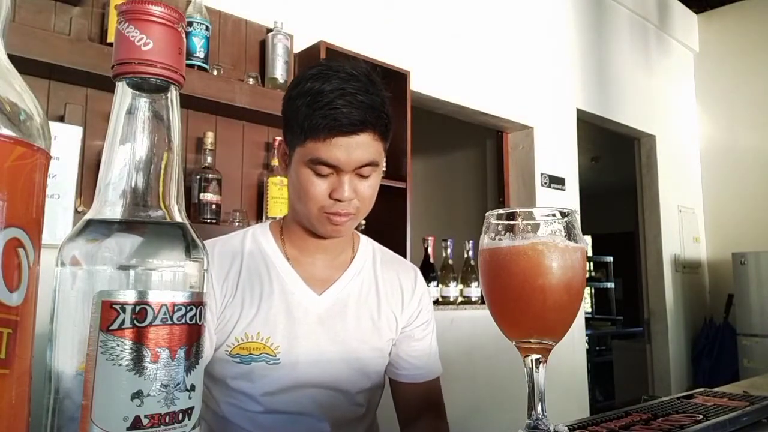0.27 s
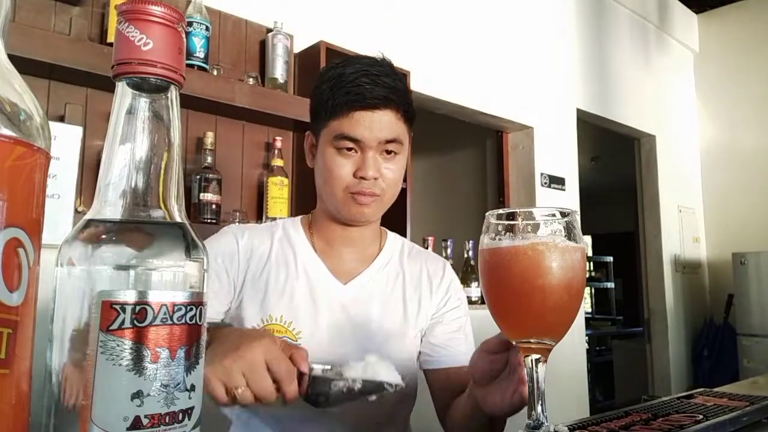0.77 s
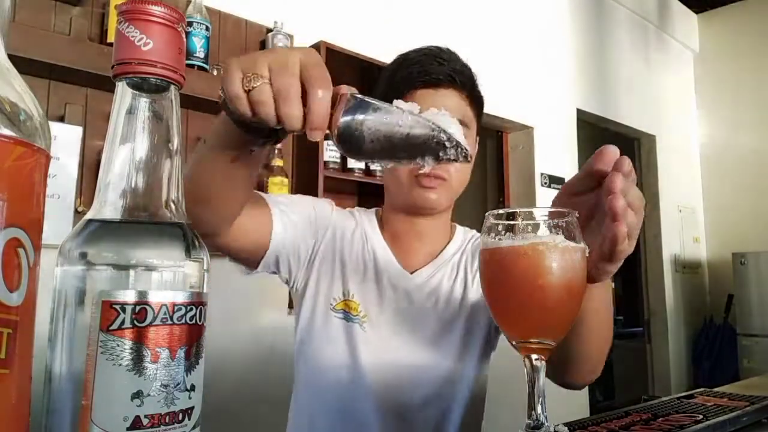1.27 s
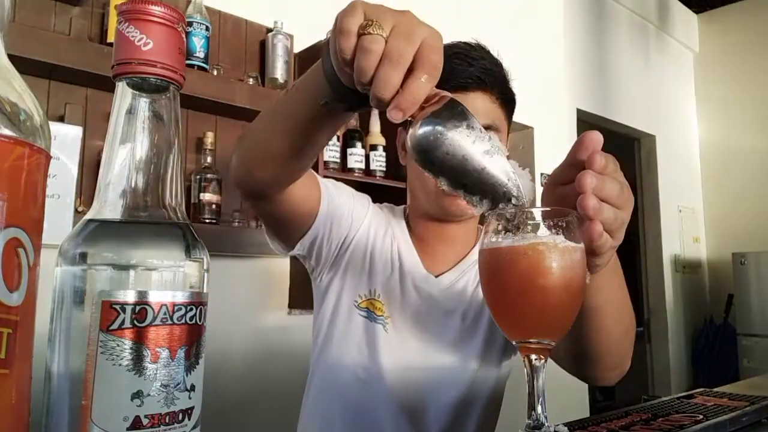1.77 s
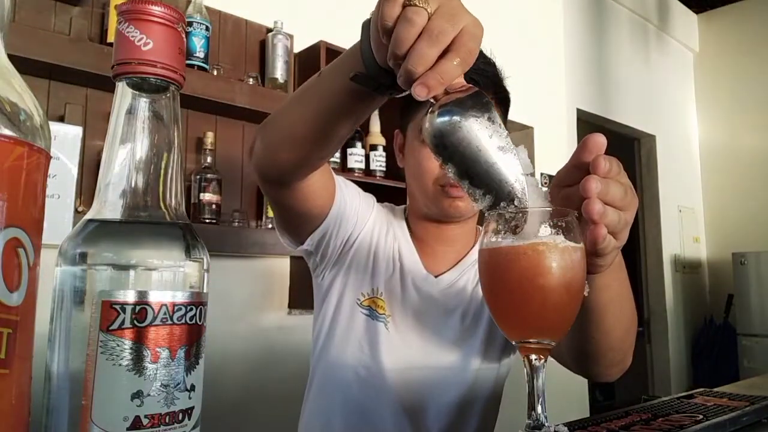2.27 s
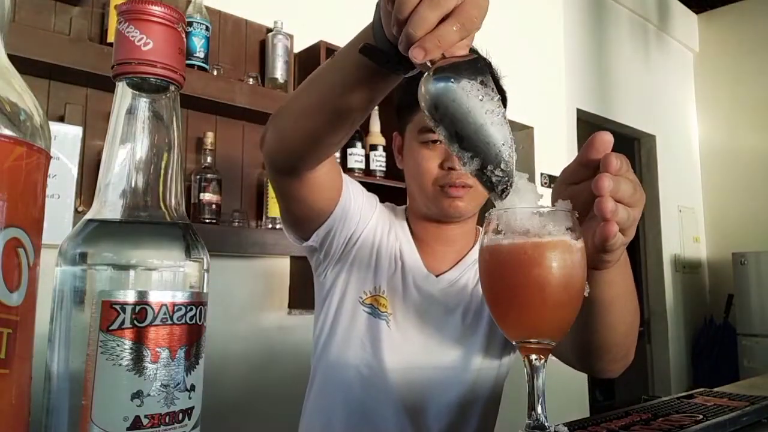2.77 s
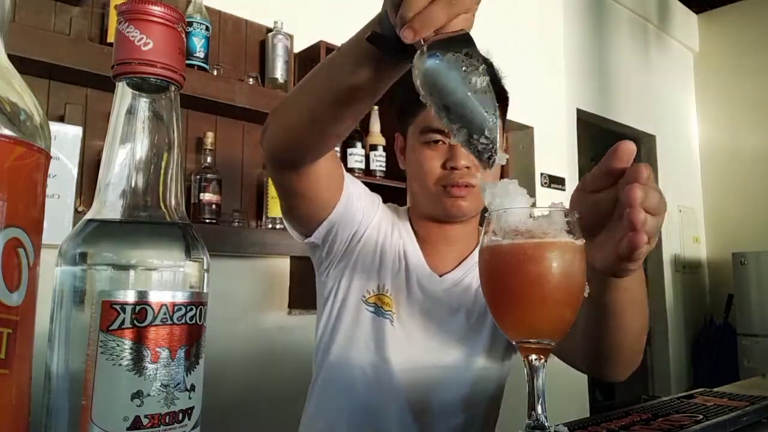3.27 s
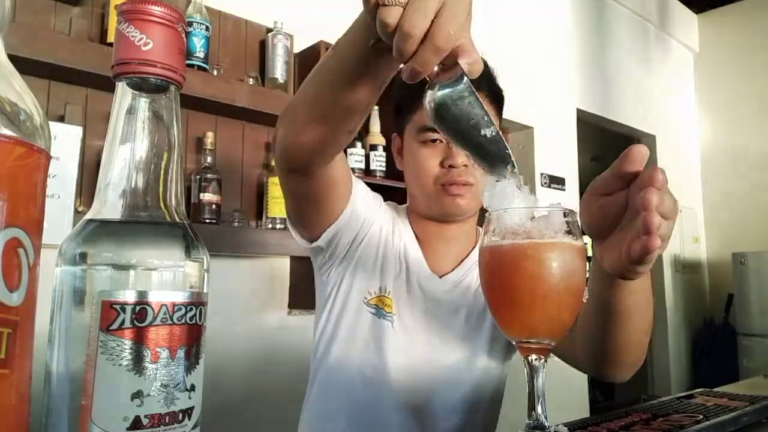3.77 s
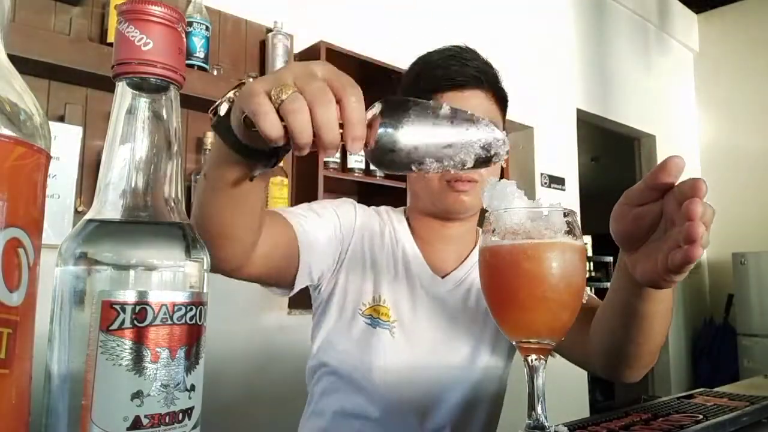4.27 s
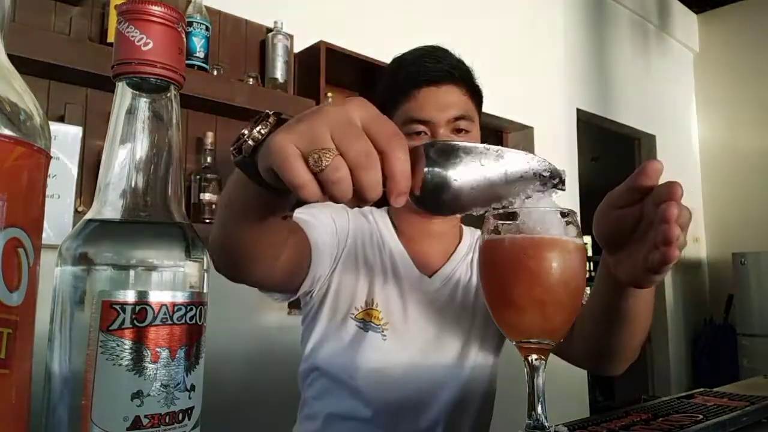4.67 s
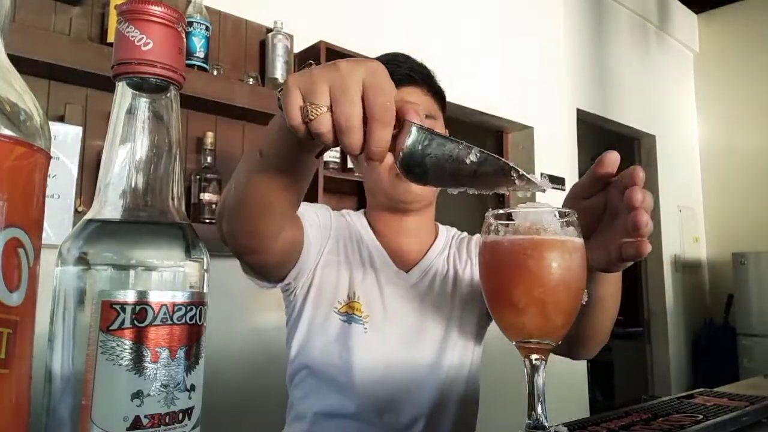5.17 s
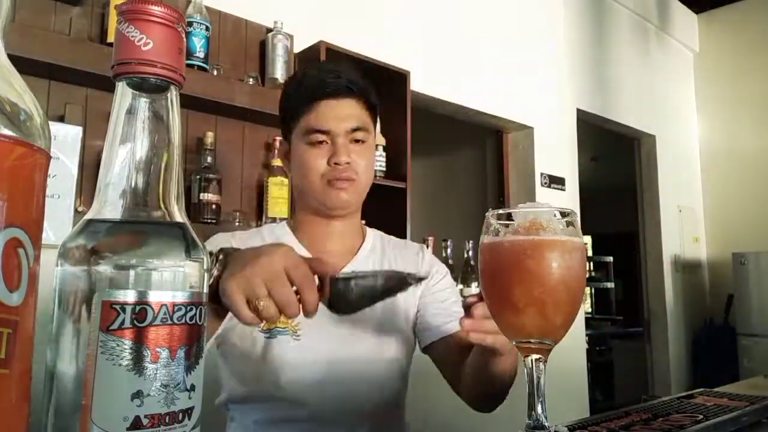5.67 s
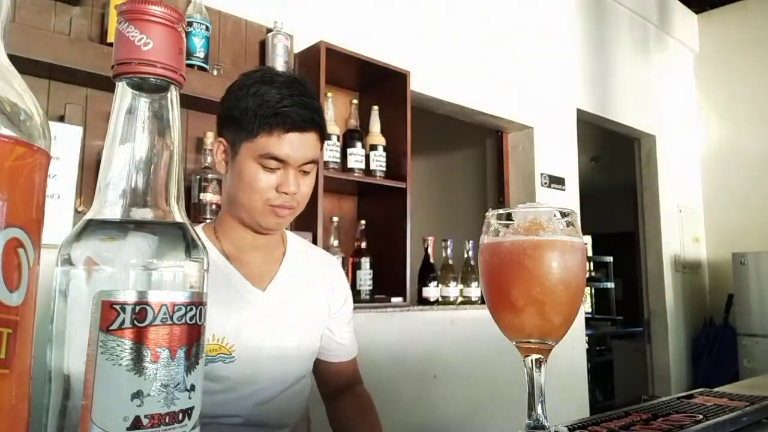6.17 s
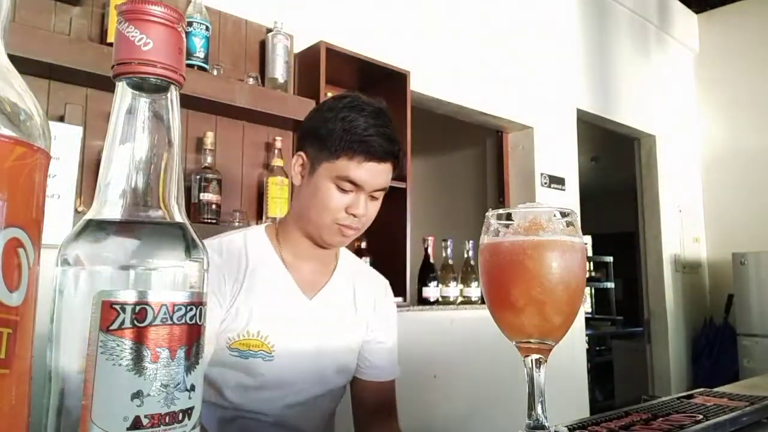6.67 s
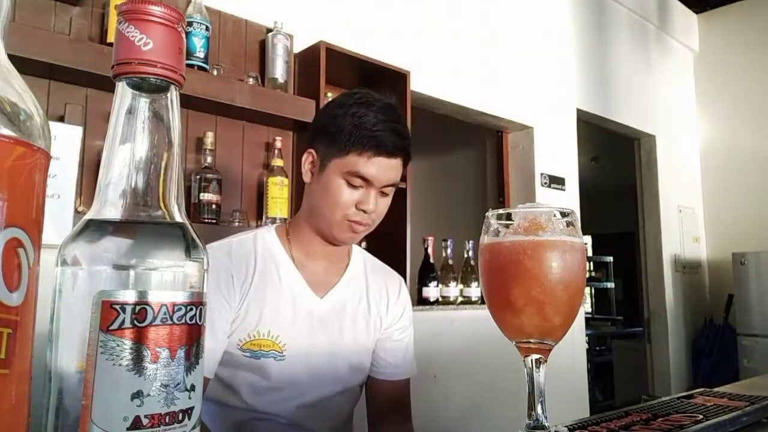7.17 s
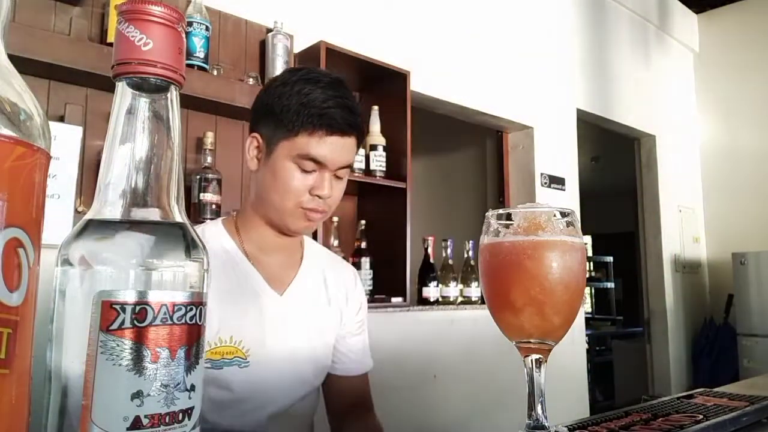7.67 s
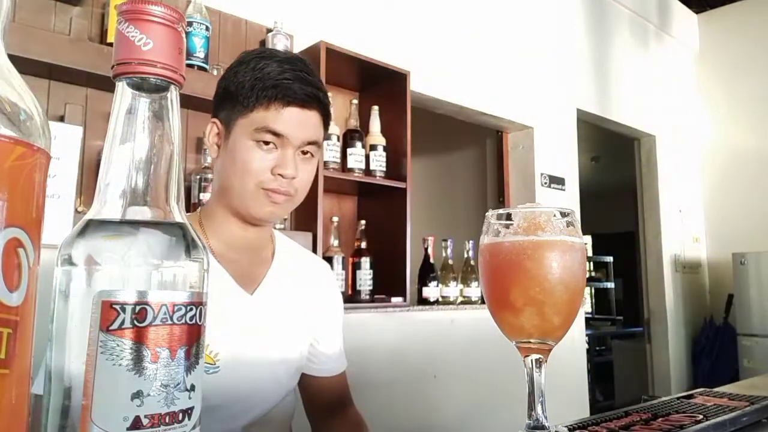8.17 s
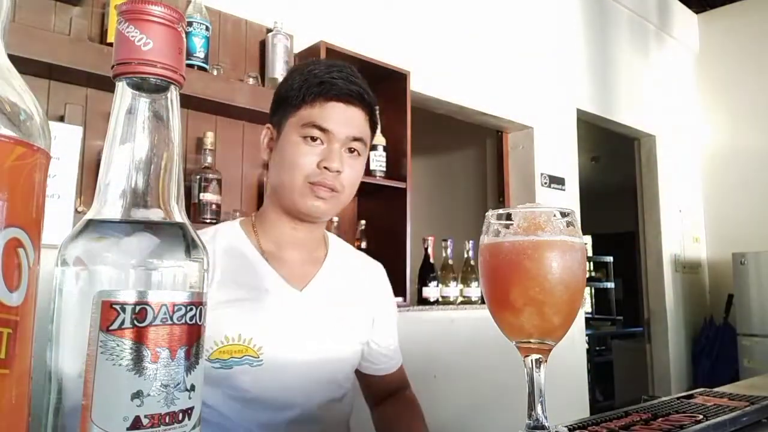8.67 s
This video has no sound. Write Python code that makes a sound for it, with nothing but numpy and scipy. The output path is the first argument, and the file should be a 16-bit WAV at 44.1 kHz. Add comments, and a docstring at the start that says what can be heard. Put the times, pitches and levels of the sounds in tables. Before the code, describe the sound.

A metal scoop chops seven times into crushed ice, then digs through loose wet lumps and clinks in a quiet bar.

```python
"""A hard-walled bar, one microphone a few metres from a metal scoop chopping seven times into crushed ice.
Each blow arrives first as a thud through the counter, then as a crunch through the air, and the steel
rings briefly. Then the scoop digs through loose, wet ice, lumps knock about and metal clinks and settles.
Faint ticks and thin tones come and go over the room's noise and a low hum."""
import sys
import numpy as np
from scipy import signal
from scipy.fft import rfft
from scipy.io import wavfile
from scipy.ndimage import uniform_filter1d

SR = 44100
rng = np.random.default_rng(int(sys.argv[2]) if len(sys.argv) > 2 else 0)


def dump_mix(stems):
    """Bounce the given channels to the path in sys.argv[1] as a 16-bit WAV at rate SR."""
    frames = np.atleast_2d(stems).T  # one column per channel
    limited = np.clip(frames, -1, 1)  # hard clip at full scale
    pcm = np.round(limited * 32767).astype(np.int16)
    wavfile.write(sys.argv[1], SR, pcm)


N = 392490
TIME = np.arange(20480) / SR  # seconds within one short sound
HZ = np.fft.rfftfreq(4096, 1 / SR)  # frequencies of every filter curve

# The bar's reverberation. Each row: frequency in Hz, seconds to fall 60 dB.
ROOM_DECAY = [(100, 0.22), (400, 0.59), (1000, 0.34), (2700, 0.42), (6000, .36), (15000, 0.29)]
# Scattered returns from the walls. Each row: delay in seconds, spread in seconds, dB over the tail.
WALL_RETURNS = [(0.0246, 0.0049, 5.5), (0.04, 0.0011, 3)]
# Colour of the room tone. Each row: frequency in Hz, gain in dB.
ROOM_TONE_COLOUR = [(20, -8), (36, -11), (56, -3), (110, -1.5), (145, -10), (185, -8), (260, -17),
                    (700, -22), (950, -19), (2400, -25.5), (5200, -38), (7100, -39.5), (8400, -34.5),
                    (11500, -43.5), (15500, -38)]
# Level of the room's noise, which swells as the chops' reverberation lingers.
# Each row: time in seconds, level in dB.
ROOM_TONE_LEVELS = [(0, -57), (2.2, -54.5), (2.6, -53.5), (3.4, -56), (4.9, -52), (5.3, -56), (8.9, -56)]
# The low hum. Each row: pitch in Hz, level in dB, width in Hz.
HUM_TONES = [(55.9, -58.5, 26), (107.8, -62, 19)]
# Blows of the scoop. Each row: start in seconds, level in dB, contact from 0 (edge) to 1 (tip),
# extra body in dB, extra sizzle in dB, centre of the sizzle in Hz.
BLOWS = [(0.1802, -29, 0.31, -1.5, -7, 10200), (0.8134, -24.5, 0, 2, -3, 11600),
         (1.612, -25, 0.17, 6, 4, 5400), (2.254, -27, 0, 11.5, 1, 9000), (3.8366, -26, 0.67, 4, 6, 10000),
         (4.2997, -24.5, 0.88, 2, 10.5, 11300), (4.7099, -22.5, 0.75, 1.5, 6.5, 8950)]
# The counter's thud. Each row: frequency in Hz, gain in dB.
COUNTER_COLOUR = [(40, -6), (90, 0), (200, 0), (500, 3), (1200, -4), (2200, -8.5), (5000, -27),
                  (15000, -31)]
# How the thud dies. Each row: frequency in Hz, seconds to fall 60 dB.
COUNTER_DECAY = [(80, 0.98), (200, 0.78), (500, 0.27), (1500, 0.36), (10000, 0.37)]
# Ice giving way. Each row: frequency in Hz, gain in dB under the edge, gain in dB under the tip.
CRUNCH_COLOUR = [(60.4, -35, -18), (170, -3.5, -13), (374, -14, -15.5), (773, -12, -5), (1070, -8, -0.5),
                 (1470, -0.5, -1), (1910, -9, -4.5), (2760, -7, -3), (3430, -13, -6.5), (6180, -24, -26.5),
                 (8360, -13.5, -20), (10000, -21.5, -22), (13000, -20.5, -30), (15500, -19, -21)]
# The scoop's steel. Each row: pitch in Hz, dB struck on the edge, dB on the tip, seconds to fall 60 dB.
SCOOP_MODES = [(980, -15, 17, 0.037), (1142, 2, 9, 0.053), (1442, -5.5, -4, 0.29), (1580, -10, -14, 0.19),
               (1780, -18, 11, 0.28), (1960, -13, 5, 0.17), (2400, -10, -37, 0.55), (2513, -6, 1, 0.5),
               (2593, -4.5, 7.5, 0.18), (2810, -18, 4, 0.42), (2900, -23, -6, 0.48), (2950, -8, -2, 0.35),
               (3105, -12.5, -11, 0.33), (3520, -18, -28, 0.14), (4970, -14.5, -12, 0.37),
               (8120, -9, -21, 0.21), (8240, -12, -3, 0.22)]
# Dry ticks close by. Each row: start in seconds, level in dB, half width in octaves, decay in seconds.
DRY_TICKS = [(1.112, -68.5, 0.35, 0.0018), (1.5779, -42, 15, 0.0017), (1.903, -69, 1.2, .02),
             (2.915, -66.5, 2.7, 0.022), (4.99, -70, 1.1, 0.018)]
# Wet lumps. Each row: start in seconds, level in dB, hollow pitch in Hz, hollow ring over crack in dB.
LUMP_KNOCKS = [(1.308, -59.5, 1900, -3), (5.353, -62, 1770, 2), (6.501, -53, 890, -8.5),
               (6.672, -56, 1500, -9), (6.711, -45, 736, -1), (7.0067, -48, 1180, -13),
               (7.035, -40.5, 862, 0), (7.0855, -45.5, 2490, 3), (7.094, -44, 1390, -4.5),
               (7.373, -53, 860, 1), (7.624, -54.5, 1420, 5), (7.649, -48.5, 986, 2),
               (7.6806, -47, 2090, 6), (7.894, -38.5, 777, -2.5), (7.961, -48, 1800, 14)]
# A lump's crack. Each row: frequency in Hz, gain in dB.
LUMP_COLOUR = [(60, 3), (180, 1.5), (400, -2), (900, 1.5), (1600, -2), (2700, 0.5), (3800, -12.5),
               (6000, -19), (8700, -15.5), (12000, -23.5), (15500, -14.5)]
# A glancing touch. Each row: frequency in Hz, gain in dB.
CLACK_COLOUR = [(100, -26), (700, -14), (1050, 1.5), (1600, 4), (2300, -8), (3200, -2.5), (5300, -9.5),
                (6200, -25), (8500, -21), (15000, -35)]
# Far-off tones. Each row: start in seconds, length in seconds, pitch in Hz, level in dB.
DISTANT_TONES = [(5.42, 0.36, 1187, -68), (8.24, 0.2, 3900, -73), (8.3, 0.34, 1146, -71)]
# Strokes through loose ice. Each row: start in seconds, level in dB.
DIG_STROKES = [(6.09, -68), (6.3, -65.5), (6.42, -61.5), (6.68, -50), (6.99, -49), (7.29, -49.5),
               (7.585, -52.5), (7.859, -51)]
# Crumbs on steel. Each row: frequency in Hz, gain in dB.
SCRAPE_COLOUR = [(100, -1), (500, -13), (900, -7), (1500, 4.5), (2300, 4.5), (3600, -7), (5500, -10.5),
                 (8700, -6.5), (12000, -11), (15500, -6)]
# The squeak's partials. Each row: factor on its pitch, dB against its level.
SQUEAK_PARTIALS = [(.81, -13), (.97, 6), (1.03, -5), (1.1, 8)]
# Metal touching metal. Each row: start in seconds, level in dB, decay of the chatter in seconds.
METAL_TOUCHES = [(8.612, -36.5, 0.0053), (8.767, -48.5, 0.0084), (8.816, -47.5, 0.023)]
# The clink's ring. Each row: pitch in Hz, relative level in dB, seconds to fall 60 dB if left free.
CLINK_MODES = [(702, -10, 0.26), (1435, -1.5, 0.41), (1540, -7, 0.24), (2681, -6.5, 0.36),
               (4200, -20, 0.43), (5130, -13.5, 0.26), (6160, -21, 0.27), (7030, -18, 0.25),
               (8570, -10.5, 0.31), (9000, -9, 0.23), (11660, -17, 0.24), (12800, -15, 0.24),
               (14500, -13, 0.26)]

STROKE_S, STROKE_RISE_S = 0.18, 0.08  # the scoop speeds up, then slows to a stop


def amp(db):
    """Decibels to gain."""
    return 10 ** (np.asarray(db) / 20)


def unit(x):
    """Scales to an energy of one."""
    return x / np.sqrt(np.sum(x ** 2) + 1e-20)


def curve(points, hz=HZ):
    """Joins points by straight lines over log frequency."""
    f, value = np.transpose(points)
    return np.interp(np.log(hz + 1), np.log(f + 1), value)


def bump(hz, octaves):
    """A bell of height one over log frequency."""
    return np.exp(-.5 * (np.log2((HZ + 1) / hz) / octaves) ** 2)


def add(mix, start, db, sound):
    """Mixes in a sound whose energy equals a twentieth of a second at db."""
    part = mix[max(round(start * SR), 0):][:len(sound)]
    part += amp(db) * np.sqrt(SR / 20) * unit(sound)[:len(part)]


def colour(x, db):
    """Causal filter with the given gain over HZ."""
    log_gain = np.log(amp(np.r_[db, db[-2:0:-1]]))
    taps = np.fft.ifft(np.exp(np.conj(signal.hilbert(log_gain)))).real
    return signal.oaconvolve(x, taps[:len(HZ)])[:len(x)]


def grains(envelope, per_s, spread_db):
    """Random clicks of uneven size under an envelope."""
    count = len(envelope)
    size = amp(spread_db * np.minimum(rng.exponential(1, count), 3))
    return unit(envelope * size * rng.choice([-1, 1], count) * (rng.random(count) < per_s / SR))


def whiten(x):
    """Evens out the broad colour of a short burst."""
    power = uniform_filter1d(abs(rfft(x[:2 * len(HZ) - 2])) ** 2, size=36)
    return unit(colour(x, -10 * np.log10(abs(power) + 1e-6)))


def dying_noise(t60):
    """Noise in which each band dies at its own speed."""
    hz, t, bands = signal.stft(rng.choice([-1., 1.], len(TIME)), SR, nperseg=256)
    fade = amp(-60 * t / curve(t60, hz)[:, None])
    return unit(signal.istft(bands * fade, SR)[1][:len(TIME)])


def complex_noise(count):
    """Random values that unsettle a tone's level and phase."""
    return rng.standard_normal(count) + 1j * rng.standard_normal(count)


def ring(modes, blur):
    """Decaying modes, each with an energy set by its dB; reflections make them waver."""
    out, moments = 0, np.linspace(0, TIME[-1], 32)
    for hz, db, t60 in modes:
        waver = np.interp(TIME, moments, 1 + blur * complex_noise(len(moments)))
        tone = np.exp((2j * np.pi * hz - np.log(1000) / t60) * TIME + 2j * np.pi * rng.random())
        out = out + amp(db) * unit((waver * tone).real)
    return unit(out)


def fuzzy_tone(hz, width_hz):
    """A wavering tone of rms one that follows a pitch curve."""
    pole = np.exp(-np.pi * width_hz / SR)
    waver = signal.lfilter([1], [1, -2 * pole, pole * pole], complex_noise(len(hz)))
    tone = np.exp(2j * np.pi * np.cumsum(hz) / SR)
    return np.sqrt(len(hz)) * unit((waver * tone).real)


def glide(start, length, hz, db, width_hz, arch=0, rise_hz_per_s=0):
    """A fuzzy tone swells and fades once; its pitch may climb, or arch by a share of itself."""
    swell = np.sin(np.pi * np.minimum(TIME / length, 1))
    pitch = hz * (1 - arch * (1 - swell)) + rise_hz_per_s * (TIME - length / 2)
    out = np.zeros(N)
    out[round(start * SR):][:len(TIME)] = amp(db) * swell * fuzzy_tone(pitch, width_hz)
    return out


def room(x, wet_db):
    """Direct sound at the microphone, then a diffuse tail that swells where the walls answer."""
    swell_db = sum(db * np.exp(-((TIME - delay) / spread) ** 2) for delay, spread, db in WALL_RETURNS)
    onset = np.clip((TIME - .003) / 0.0014, 0, 1)
    response = amp(wet_db) * whiten(dying_noise(ROOM_DECAY) * onset * amp(swell_db))
    response[0] += 1
    return signal.oaconvolve(x, unit(response))[:len(x)]


def room_tone():
    """The bar's noise, which swells as the chops' reverberation lingers, and a wavering low hum."""
    air = np.sqrt(N) * unit(colour(rng.standard_normal(N), curve(ROOM_TONE_COLOUR)))
    level_db = np.interp(np.arange(N) / SR, *np.transpose(ROOM_TONE_LEVELS))
    hum = sum(amp(db) * fuzzy_tone(np.full(N, hz), width) for hz, db, width in HUM_TONES)
    return air * amp(level_db) + hum


def counter_thuds(lead_s=.0092):
    """Each chop runs through the woodwork and reaches the microphone ahead of its airborne sound."""
    out = np.zeros(N)
    for start, db, _, body_db, *_ in BLOWS:
        push = (TIME == 0) * 0.25 + dying_noise(COUNTER_DECAY)
        thud_db = -31.5 + .3 * db + 0.26 * body_db  # harder and deeper chops shake it more
        add(out, start - lead_s, thud_db, colour(push, curve(COUNTER_COLOUR)))
    return out


def chops(body_hz=614, shimmer_hz=2720, shimmer_t60_s=0.51):
    """The steel bites, the ice gives way a few ms later, crumbs scatter and the scoop rings."""
    out = np.zeros(N)
    bite = (TIME < .0105) * (.55 + np.exp(-((TIME - .0065) / .003) ** 2))
    for start, db, tip, body_db, sizzle_db, sizzle_hz in BLOWS:
        crack = whiten(grains(bite, per_s=14000, spread_db=2.94))
        crumbs = grains(np.exp(-TIME / 0.022), per_s=1600, spread_db=0.43)
        crumbs *= amp(-15 + 1.3 * body_db)  # deeper chops crumble more ice
        crunch_db = curve([(hz, a + tip * (b - a)) for hz, a, b in CRUNCH_COLOUR])
        crunch = unit(colour(whiten(room(crack + crumbs, wet_db=0.5)), crunch_db))
        # The tip sets a cluster of close steel modes shimmering.
        cluster = colour(rng.standard_normal(len(TIME)), 40 * bump(shimmer_hz, 0.23))
        shimmer = unit(cluster * amp(-60 * TIME / shimmer_t60_s))
        modes = [(hz, a + tip * (b - a), t60) for hz, a, b, t60 in SCOOP_MODES]
        steel = ring(modes, blur=1.3) * np.minimum(TIME / 0.0055, 1)
        chop = crunch + amp(-4) * steel + tip * amp(-3.5) * shimmer
        emphasis_db = body_db * bump(body_hz, 0.61) + sizzle_db * bump(sizzle_hz, 0.36)
        add(out, start, db, colour(chop, emphasis_db))
    return out


def ticks(centre_hz=10200):
    """Tiny dry snaps and fizzes close to the microphone."""
    out = np.zeros(N)
    for start, db, octaves, decay_s in DRY_TICKS:
        snap = grains(np.exp(-TIME / decay_s), per_s=19000, spread_db=3.4)
        add(out, start, db, colour(snap, 35 * bump(centre_hz, octaves)))
    return out


def lump(db, hz, hollow_db):
    """A lump strikes with a short crackle, and the wet hollow around it rings for a few cycles."""
    strike = np.minimum(TIME / .002, 1) * (np.exp(-TIME / .0028) + .13 * np.exp(-TIME / .014))
    crack = whiten(room(grains(strike, per_s=12000, spread_db=4.5), wet_db=-3))
    cycles = hz * TIME
    envelope = (1 - np.exp(-cycles / 1.2)) * np.exp(-cycles / 4.1)
    hollow = room(np.sin(2 * np.pi * cycles) * envelope, wet_db=-7)
    tilt_db = (-0.7 - 0.21 * hollow_db) * np.log2(HZ / 1000 + .5)  # hollower lumps crack duller
    bass_db = 0.36 * max(db + 51, 0) * bump(220, 0.75)  # louder lumps are heavier and bump the bin
    return unit(colour(crack, curve(LUMP_COLOUR) + tilt_db + bass_db)) + amp(hollow_db) * unit(hollow)


def knocks(rebound_s=.0105, jostle_hz=1900, jostle_db=-7):
    """Large lumps knock and drop back, softer and lower; each stroke also jostles two small ones."""
    out = np.zeros(N)
    for start, db, hz, hollow_db in LUMP_KNOCKS:
        add(out, start, db, lump(db, hz, hollow_db))
        add(out, start + rebound_s * rng.uniform(.9, 1.1), db - 4, lump(db, hz * .8, hollow_db))
    for start, db in DIG_STROKES:
        for when, pitch in rng.random(size=(2, 2)):
            hz = jostle_hz * 2 ** (0.44 * (2 * pitch - 1))
            small_lump = lump(db + jostle_db, hz, hollow_db=4)
            add(out, start + STROKE_RISE_S * (.5 + when), db + jostle_db, small_lump)
    return out


def clack():
    """The scoop glances off a lump just before the fourth chop."""
    out = np.zeros(N)
    touch = np.exp(-TIME / 0.013) * np.minimum(TIME / .003, 1)
    rattle = whiten(room(grains(touch, per_s=9000, spread_db=0.92), wet_db=-3.5))
    add(out, start=2.2145, db=-35, sound=colour(rattle, curve(CLACK_COLOUR)))
    return out


def whistle():
    """A faint, airy whistle that rises."""
    return glide(start=2.98, length=.28, hz=5450, db=-72, width_hz=640, rise_hz_per_s=3400)


def far_tones():
    """Thin, fuzzy tones far off, at the edge of hearing."""
    return sum(glide(*row, width_hz=90) for row in DISTANT_TONES)


def strokes():
    """Crumbs slide along the steel, louder as the scoop speeds up."""
    level, t = np.zeros(N), np.arange(N) / SR
    for start, db in DIG_STROKES:
        speed = np.interp(t - start, [0, STROKE_RISE_S, STROKE_S], [0, 1, 0])
        level += amp(db) * np.sqrt(speed)
    crumbs = grains(np.ones(N), per_s=2200, spread_db=3.3)
    return level * np.sqrt(N) * unit(colour(crumbs, curve(SCRAPE_COLOUR)))


def squeak():
    """A very high, faint squeak of several partials that arch together."""
    return sum(glide(start=8.12, length=.29, hz=14400 * factor, db=db - 72, width_hz=160, arch=.14)
               for factor, db in SQUEAK_PARTIALS)


def clink():
    """A light metal-on-metal tap that chatters and is soon damped, then two duller touches as it settles."""
    out = np.zeros(N)
    damping = np.exp(-np.maximum(TIME - .1, 0) / 0.021)
    tap_db = curve(LUMP_COLOUR) + 9 * bump(1500, 0.37) - 6 * bump(2700, 0.54) + 3 * bump(9200, 0.79)
    first_db = METAL_TOUCHES[0][1]
    for start, db, chatter_s in METAL_TOUCHES:
        contact = np.exp(-TIME / chatter_s) + 0.2 * np.exp(-TIME / 0.017)
        chatter = whiten(room(grains(contact, per_s=5500, spread_db=2), wet_db=1.5))
        tap = unit(colour(chatter, tap_db))
        metal = ring(CLINK_MODES, blur=0.92) * damping * np.minimum(TIME / 0.0026, 1)
        dull_db = 0.58 * (db - first_db) * np.log2(1 + HZ / 1500)  # weaker touches lose treble
        add(out, start, db, colour(metal + amp(-0.5) * tap, dull_db))
    return out


def scene():
    """Ice work a few metres off, thuds through the counter, faint small sounds and room tone, in mono."""
    ice = chops() + clack() + knocks() + room(strokes(), wet_db=0) + clink()
    faint = ticks() + squeak() + whistle() + far_tones()
    return (ice + counter_thuds() + faint + room_tone())[None]


def record(dry):
    """The recorder cuts the treble above 15.9 kHz."""
    lowpass = signal.firwin(511, 15900, window=("kaiser", 9), fs=SR)
    return signal.oaconvolve(dry, lowpass[None], "same")


dry = scene()
out = record(dry)
dump_mix(out)
```